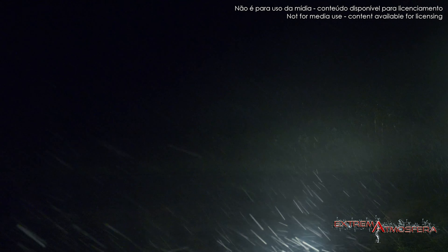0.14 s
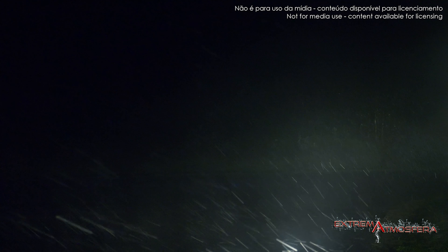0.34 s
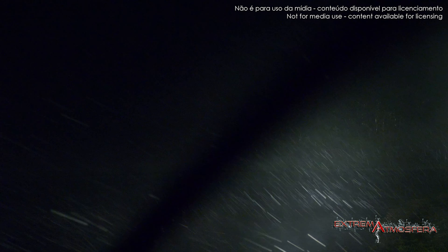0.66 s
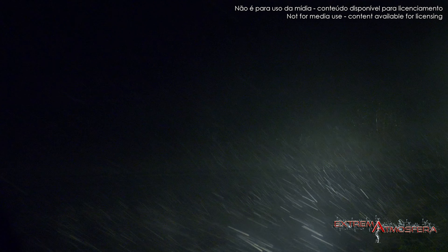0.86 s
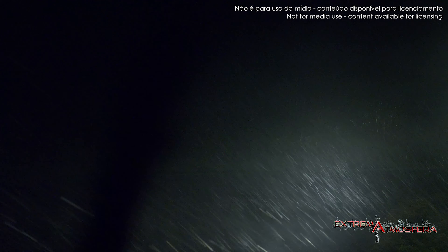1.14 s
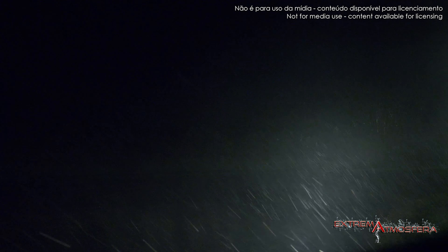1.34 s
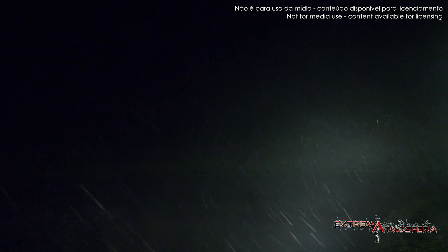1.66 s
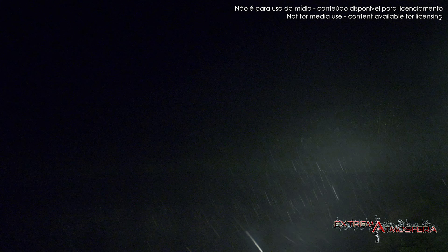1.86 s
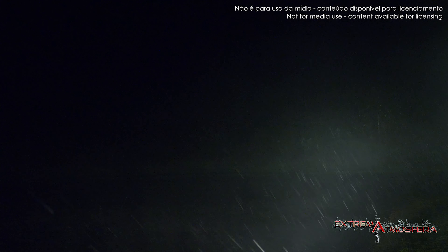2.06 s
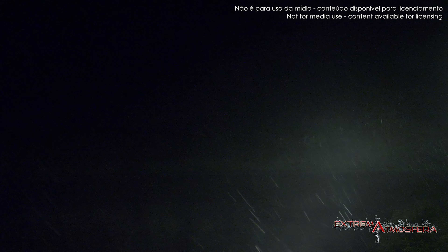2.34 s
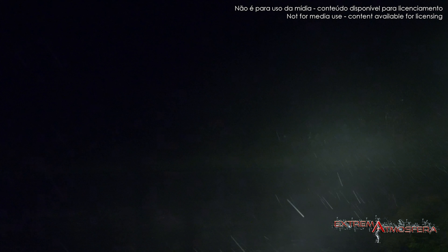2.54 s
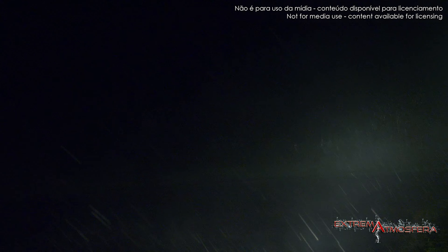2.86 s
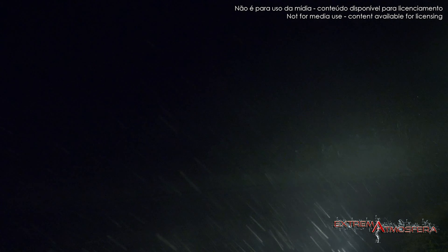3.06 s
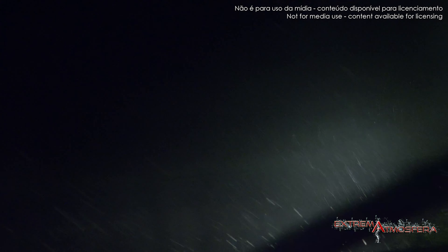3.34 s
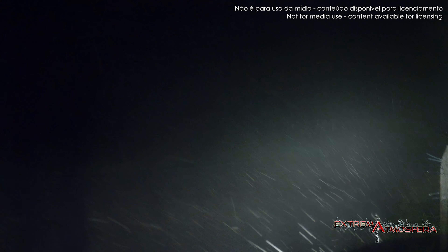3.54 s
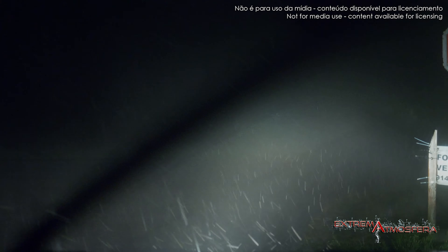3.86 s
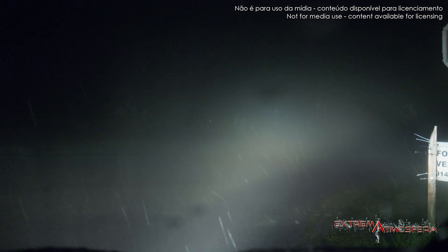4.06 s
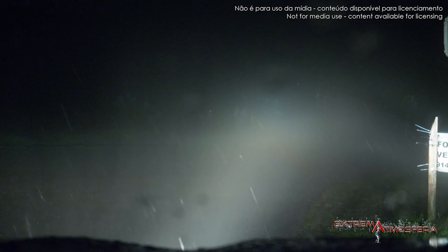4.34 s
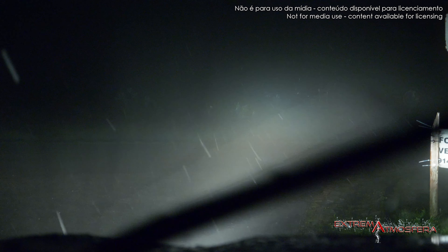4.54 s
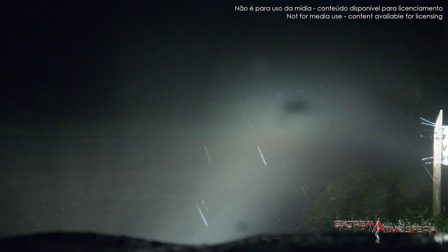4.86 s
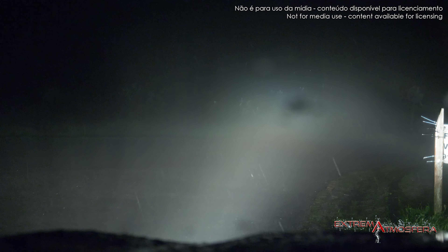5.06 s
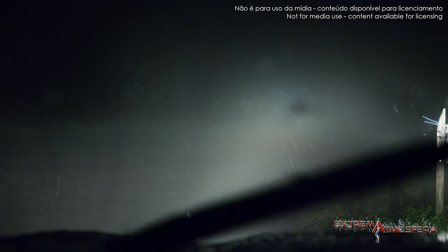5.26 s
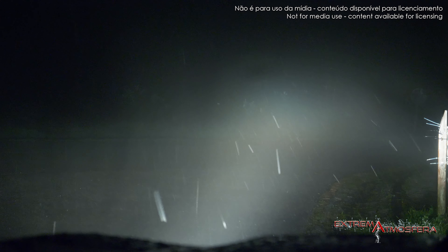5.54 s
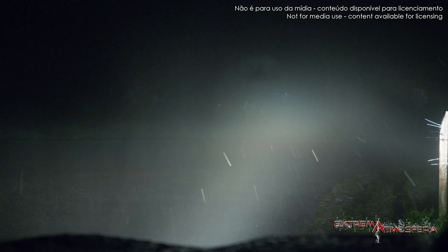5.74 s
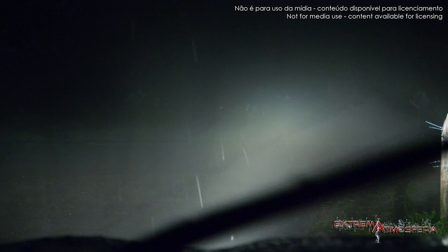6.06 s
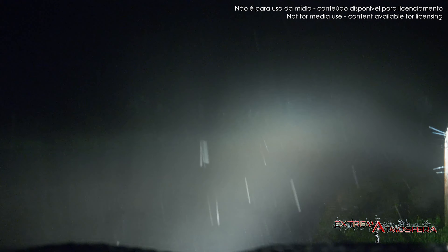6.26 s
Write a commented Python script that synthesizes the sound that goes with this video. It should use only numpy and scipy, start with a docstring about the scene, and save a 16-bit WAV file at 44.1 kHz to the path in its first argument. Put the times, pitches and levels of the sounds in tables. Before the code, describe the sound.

Sleet drums and hisses on a standing car, heard from inside, with wiper thuds, knocks and a low engine idle.

```python
"""Sleet on a standing car

Heard from inside at night: gusts of sleet drum on the panels, patter on the roof and hiss on the glass.
Single pellets tick; one hard gust rings the windscreen and dies with a whistle. The wiper thuds and
shudders at each turn and something knocks close by, over the idling engine and whining wiper motor."""
import sys
import numpy as np
from scipy import signal
from scipy.fft import rfft, irfft, next_fast_len
from scipy.io import wavfile
from scipy.ndimage import uniform_filter1d, map_coordinates

SR = 44100
rng = np.random.default_rng(int(sys.argv[2]) if len(sys.argv) > 2 else 0)


def unload_audio(sound):
    """Save the sound as a 16-bit wav file, at the path given as the first command line argument."""
    columns = np.transpose(np.atleast_2d(sound))
    # keep every value between -1 and 1, then stretch to whole-number steps
    steps = np.round(np.clip(columns, -1, 1) * 32767)
    wavfile.write(sys.argv[1], SR, steps.astype(np.int16))


N = 281799


def amp(db):
    return 10 ** (np.asarray(db) / 20)


def unit_rms(x):
    return x / np.sqrt(np.mean(x ** 2) + 1e-20)


def log_interp(points, hz):
    """Read (Hz, value) points along a log frequency axis."""
    point_hz, values = np.transpose(points)
    return np.interp(np.log(hz + 1), np.log(point_hz + 1), values)


def curves(rows):
    """One value per sample for each column after the time."""
    times_s, *columns = np.transpose(rows)
    return [np.interp(np.arange(N) / SR, times_s, column) for column in columns]


def wobble(knots_per_s):
    """A smooth random curve."""
    knots = rng.standard_normal(int(N * knots_per_s / SR) + 4)
    return map_coordinates(knots, [np.arange(N) * knots_per_s / SR])


def filtered(x, response):
    """Apply a gain given as a function of Hz."""
    size = next_fast_len(N + SR // 2)
    return irfft(rfft(x, size) * response(np.fft.rfftfreq(size, 1 / SR)), size)[..., :N]


def fuzzy_tone(rows, blur_hz, waver_db=2.5):
    """A sine along (s, Hz, dB) rows, jittering in pitch and level."""
    hz, db = curves(rows)
    level = amp(db + waver_db * wobble(40))
    return level * np.sin(2 * np.pi * np.cumsum(hz + blur_hz * wobble(90)) / SR)


# Stereo image of the sleet. Each row: frequency in Hz, left-right correlation.
CORRELATION = [(60, 1.0), (130, 1.0), (290, 1), (640, 0.98), (1410, 0.73), (3100, 0.72), (6820, 0.98),
               (15000, 0.69)]
# Windscreen resonances. Each row: centre in Hz, width in Hz, lift in dB.
GLASS_MODES = [(500, 120, 3), (1850, 200, 4), (3800, 400, 5), (5200, 400, 3), (7560, 400, 4),
               (9900, 600, 6), (11500, 450, 6), (13100, 400, 5)]


def shower(spectrum, on_glass, hits_per_s, spread_db, t60_s, burst_share, patchy_db):
    """Stereo pellet noise, rms 1: short uneven bursts on the blur of countless far ones."""
    hits = (rng.random(N) < hits_per_s / SR) * amp(spread_db * np.minimum(rng.exponential(size=N), 2))
    bursts = unit_rms(signal.lfilter([1], [1, -amp(-60 / (t60_s * SR))], hits))
    envelope = np.sqrt(1 - burst_share + burst_share * bursts ** 2)
    bins = signal.stft(rng.standard_normal((2, N)) * envelope, nperseg=128)[2]
    # Pellets land on different panels, so the colour comes in patches.
    patches = uniform_filter1d(uniform_filter1d(rng.standard_normal(bins.shape[1:]), 5, 0), 6, 1)
    pair = signal.istft(bins * amp(patchy_db * unit_rms(patches)), nperseg=128)[1][:, :N]

    def mid_side_gains(hz):
        angle = np.arccos(log_interp(CORRELATION, hz)) / 2
        glass_db = sum(db / (1 + (2 * (hz - centre) / width) ** 2) for centre, width, db in GLASS_MODES)
        return amp(log_interp(spectrum, hz) + on_glass * glass_db) * [np.cos(angle), np.sin(angle)]

    mid, side = filtered(pair, mid_side_gains)
    return unit_rms(np.array([mid + side, mid - side]))


# Storm strength. Each row: time in seconds, then drum, patter and hiss levels in dB.
STORM_LEVELS = [(0, -32.5, -44, -45), (.14, -42, -48, -46.5), (.3, -43.5, -48, -58),
                (.5, -44, -46.5, -58.5), (.8, -43.5, -50.5, -54.5), (1.12, -48, -44.5, -52),
                (1.28, -44, -49, -52), (1.5, -45.5, -48, -47), (1.9, -42, -45, -49), (2.3, -44, -46, -46),
                (2.52, -38, -43, -43), (2.9, -39.5, -42.5, -45), (3.1, -42, -45.5, -47),
                (3.56, -42, -40.5, -49), (3.68, -44.5, -44.5, -62), (4.2, -37, -41, -60),
                (4.5, -41.5, -45, -61.5), (4.9, -40, -50, -67.5), (5.5, -42, -54, -76),
                (5.88, -38, -51.5, -67), (6.03, -42.5, -49.5, -64), (6.39, -39, -56, -64.5)]
# Panel drum, roof patter, fine ice on glass. Each row: frequency in Hz, relative density in dB.
DRUM_SPECTRUM = [(50, -42), (85, -33), (99, -0.5), (144, -1.5), (248, -7), (451, -10), (632, -17),
                 (747, -21), (813, -27), (884, -40), (1500, -27.5), (1950, -50), (3300, -120)]
PATTER_SPECTRUM = [(210, -21), (350, -5.5), (449, -4.5), (494, -11), (749, -10.5), (814, -11.5),
                   (1460, -14.5), (1660, -16), (3820, -28.5), (6000, -40), (7800, -56), (13200, -120)]
HISS_SPECTRUM = [(880, -17), (1500, -8), (1620, -1.5), (2510, 0), (2880, -3.5), (3660, 0.5), (6760, -5.5),
                 (11300, -5.5), (14600, -11), (16000, -21)]


def sleet(shake_db=5, shake_s=0.052):
    """Three showers swell and flutter with the wind; the panels drum louder as the wiper turns."""
    drum_db, patter_db, hiss_db = curves(STORM_LEVELS)
    t = np.arange(N) / SR
    shake = sum(np.exp(-((t - turn_s) / shake_s) ** 2) for turn_s, *_ in PARK_TURNS + TOP_TURNS)
    flutter = wobble(12)
    drum = amp(drum_db + shake_db * shake + 1.54 * wobble(20)) * shower(
        DRUM_SPECTRUM, on_glass=0, hits_per_s=120, spread_db=-2,
        t60_s=0.062, burst_share=0.28, patchy_db=-0.06)
    patter = amp(patter_db + 0.13 * flutter) * shower(
        PATTER_SPECTRUM, on_glass=0.36, hits_per_s=220, spread_db=2.5,
        t60_s=0.043, burst_share=0.62, patchy_db=1)
    hiss = amp(hiss_db + 1.5 * flutter) * shower(
        HISS_SPECTRUM, on_glass=0, hits_per_s=170, spread_db=8.5,
        t60_s=0.012, burst_share=0.14, patchy_db=1.5)
    return drum + patter + hiss


# Engine tones. Each row: multiple of the firing rate, level in dB before the bass cut.
ENGINE_ORDERS = [(2, -41.5), (3, -54), (4, -50), (5, -55), (6, -46.5), (7, -51), (8, -60), (9, -55),
                 (10, -60)]


def engine(firing_hz=27.39, waver_db=0.7):
    """Idle: harmonics of the firing rate, the speed hunting slightly."""
    firings = np.cumsum(firing_hz * (1 + 0.002 * wobble(2))) / SR
    return sum(amp(db + waver_db * wobble(2.9)) * np.sin(2 * np.pi * (order * firings + rng.random()))
               for order, db in ENGINE_ORDERS)


# Motor and gear tones. Each row: time in seconds, pitch in Hz, level in dB.
MOTOR_WHINE = [(0, 1450, -70), (.25, 1450, -63), (.5, 1420, -70), (4.3, 1440, -66), (4.5, 1480, -59),
               (4.8, 1470, -61), (5.1, 1430, -62), (5.3, 1500, -58), (5.55, 1380, -59), (5.75, 1450, -62),
               (6.0, 1480, -58), (6.39, 1450, -59)]
GEAR_WHINE = [(4.9, 2400, -90), (5.2, 2420, -68), (5.7, 2400, -69), (6.0, 2400, -90)]


def wiper_motor():
    """A faint rough whine that bends with the load, and a weaker gear tone above it."""
    return fuzzy_tone(MOTOR_WHINE, blur_hz=35) + fuzzy_tone(GEAR_WHINE, blur_hz=35)


def stray_pellets(per_s=12):
    """Random tick rows: level follows the patter, brightness the hiss's lead over it."""
    level, brightness, pitch, pan = rng.standard_normal((int(per_s * N / SR), 4)).T
    start_s = rng.random(len(level)) * N / SR
    _, patter_db, hiss_db = np.array(curves(STORM_LEVELS))[:, (start_s * SR).astype(int)]
    db = patter_db + 9 + 3 * level
    bright_db = -1.5 + 0.77 * (hiss_db - patter_db) + 4 * brightness
    ping_hz = 3020 * np.exp(0.12 * pitch)
    return list(zip(start_s, db, bright_db, ping_hz, 3 * pan))


# Sharp ticks: sleet pellets and the cracks of knocks and wiper thuds. Each row: start in seconds,
# level in dB, bright band offset in dB, ping in Hz, left over right in dB.
SHARP_TICKS = [(.0384, -31, 9, 3640, 0), (.0864, -33, 9, 3870, 0), (.3153, -30.5, -12, 3680, -3),
               (.39, -29, -8, 2950, 2), (.443, -40, 13, 3040, 1), (.4539, -42, 15, 6250, -2),
               (.4716, -29.5, -10, 3880, 6), (.551, -21.5, -22, 2340, -7), (.5617, -20, -18, 3000, 6),
               (.5805, -22.5, -10, 2480, -3), (.6147, -27, -14, 3600, 1), (.636, -29, 3, 3520, 0),
               (.6635, -35, 5, 3570, 0), (.737, -31.5, 3, 3626, -8), (.7844, -35, 3, 3670, -5),
               (1.3083, -4.5, -20, 2200, -4), (1.5903, -27, 4, 2560, 0), (1.7926, -24.5, 10, 2420, 0),
               (2.0857, -4, -12, 3830, 0), (2.155, -24, 1.5, 3350, 0), (2.5716, -13, -5, 2640, 8),
               (2.6737, -32, 1, 8120, 0), (2.7515, -21, -9, 2870, 9), (2.7574, -23, 0, 2710, 3),
               (2.8045, -35, 12, 2580, 0), (2.9195, -27.5, 9, 3510, 0), (3.0041, -37, 11, 4340, 0),
               (3.1818, -24, 2, 3590, 0), (3.2046, -28, 9, 2480, 5), (3.2108, -14, -19, 2410, -6),
               (3.253, -27, 3, 3500, 0), (3.65, -28, -17, 3330, 0), (3.684, -30, -12, 2630, 1.5),
               (3.7, -36, -3, 3910, 0), (3.7194, -41, 3, 3450, 1), (3.7823, -28, -14, 2570, 1),
               (4.075, -25, -10, 2550, 1), (4.469, -29, -17, 2680, 0), (3.7648, -28, -29, 3200, -1),
               (3.8412, -30, -4, 3530, 3), (3.9514, -29.5, -12, 4150, 7), (4.0437, -25, -4, 4160, 3),
               (4.0925, -27, -21, 3610, 3), (4.121, -25.5, -17, 2880, 5), (4.167, -27, 3, 3670, 4),
               (4.2088, -27, -15, 3930, 0), (4.2384, -24, -19, 2560, 1), (4.2857, -30.5, 3.5, 3680, 0),
               (4.3174, -22, -5, 2950, -1.5), (4.3274, -24, -21, 2550, 5), (4.6004, -29, -19, 3050, -3),
               (4.7308, -34, 3, 3250, 0), (4.9228, -31, -29, 3800, 1.5), (5.01, -40.5, -18, 5600, 6),
               (5.408, -41, -4, 3130, 6), (4.9492, -35, -14, 3930, -3), (5.458, -39, -18, 2200, 1),
               (5.5039, -38, -12, 3200, -2), (5.5977, -42, -12, 2500, 1), (5.6785, -43, 0, 2850, 1),
               (5.7334, -54, 0, 2890, 0), (5.8825, -41, -8, 2500, 0), (5.6251, -37, -21, 3570, -1),
               (5.7959, -29, -22, 4600, 4), (5.8282, -26, -14, 3150, 4), (5.9216, -34, -26, 5570, 5),
               (5.969, -20.5, -6, 2750, 1), (5.9754, -25, -15, 2700, -3), (6.0085, -23.5, -12, 2760, 3),
               (6.0157, -33, -4, 2720, -9), (6.113, -42, -25, 5700, 1), (6.1847, -25.5, -9, 2640, 0),
               (6.211, -41, -9, 2700, 3)]


def sharp_ticks():
    """Each hard impact gives a short ping and a noise burst in a dull and a bright band."""
    def band(low_hz, high_hz):
        return lambda hz: 1 / np.sqrt((1 + (low_hz / (hz + 1)) ** 4) * (1 + (hz / high_hz) ** 4))

    dull, bright = np.zeros((2, 2, N + SR))
    t = np.arange(SR // 20) / SR
    burst = amp(-60 * t / 0.0081) * (1 - np.exp(-t / 0.00094))
    for start_s, db, bright_db, ping_hz, pan_db in SHARP_TICKS + stray_pellets():
        noise = rng.standard_normal((2, len(t)))
        gains = amp(db + np.array([[pan_db / 2], [-pan_db / 2]]))
        ping_gain = 0.2 * (ping_hz / 3500) ** 2.5  # higher pings ring more clearly
        ping = ping_gain * amp(-60 * t / 0.014) * np.sin(2 * np.pi * ping_hz * t)
        at = round(start_s * SR)
        dull[:, at:at + len(t)] += gains * (burst * noise[0] + ping)
        bright[:, at:at + len(t)] += gains * amp(bright_db) * burst * noise[1]
    return filtered(dull[:, :N], band(1100, 5500)) + filtered(bright[:, :N], band(7500, 14000))


# Body and dashboard modes. Each row: frequency in Hz, t60 in seconds.
BODY_MODES = [(105, 0.12), (120, 0.21), (145, 0.28), (185, 0.067), (220, 0.061), (285, 0.046), (370, 0.041),
              (470, 0.073), (530, 0.078), (630, 0.067), (700, 0.017), (820, 0.014)]
# Contact noise. Each row: frequency in Hz, gain in dB.
CRACK_SPECTRUM = [(400, 11.5), (700, 6.5), (1100, 0), (1950, -5), (3000, -14), (4500, -18.5), (8000, -38),
                  (16000, -37)]


def thuds(events, contacts, crack_t60_s=0.049):
    """Each contact pushes the modes near its centre in phase: a sharp swing, a ring, a crack on top."""
    ring, crack = np.zeros((2, N + SR))
    t = np.arange(SR // 5) / SR
    mode_hz, t60_s = np.transpose(BODY_MODES)[:, :, None]
    modes = np.sin(2 * np.pi * mode_hz * t) * amp(-60 * t / t60_s) * (1 - np.exp(-t / 0.0009))
    blows = [(start_s + pace * offset_s, db + offset_db, hz * ratio, crack_db + crack_offset_db)
             for rows, pattern in zip(events, contacts)
             for start_s, db, hz, crack_db, pace in rows
             for offset_s, offset_db, ratio, crack_offset_db in pattern]
    spots = amp(3 * rng.standard_normal((len(blows), len(modes))))  # every blow lands somewhere else
    for (start_s, db, centre_hz, crack_db), spot in zip(blows, spots):
        weights = spot * np.exp(-(np.log(mode_hz[:, 0] / centre_hz) / 0.37) ** 2)
        at = round(start_s * SR)
        ring[at:at + len(t)] += amp(db) * (weights / np.linalg.norm(weights)) @ modes
        crack[at:at + len(t)] += amp(db + crack_db - 60 * t / crack_t60_s) * rng.standard_normal(len(t))
    return ring[:N] + filtered(crack[:N], lambda hz: amp(log_interp(CRACK_SPECTRUM, hz)))


# Nearby knocks. Each row: start in seconds, level in dB, ring centre in Hz, crack offset in dB.
NEAR_KNOCKS = [(.045, -25, 153, -37), (0.065, -24.5, 158, -24), (0.151, -25.5, 182, -9),
               (0.172, -23, 152, -25), (.216, -24.5, 135, -22), (0.259, -27, 147, -10),
               (1.793, -7.5, 340, 4.5), (1.821, -17.5, 198, -6), (1.804, -20.5, 300, 2),
               (1.892, -25.5, 218, -18), (2.068, -24, 320, 1), (2.086, -2.5, 447, -8),
               (2.155, -17.5, 195, -2.5), (2.582, -22, 200, -7), (2.6, -23.5, 167, -10),
               (2.834, -27.5, 166, -15), (3.214, -32, 188, -14), (3.411, -24, 290, -13.5),
               (3.665, -27, 180, -9), (3.859, -25.5, 203, -9), (4.072, -31.5, 214, -3.5),
               (4.352, -19, 112, -30), (5.055, -37, 300, -8), (5.547, -33.5, 298, -17),
               (5.703, -29.5, 201, -21), (6.086, -32, 250, -16), (6.224, -30, 400, -4.5)]
# Wiper reversals at each end of the sweep. Each row: as for a knock, then time stretch of the shudder.
PARK_TURNS = [(2.751, -13, 227, -13.5, 0.84), (4.327, -15, 181, 1.5, 1.02), (5.828, -15, 246, -5, 1.05)]
TOP_TURNS = [(0.56, -20, 300, -7, 1.4), (1.975, -18, 336, -3, 0.84), (3.594, -15.5, 299, -20, 1.05),
             (5.109, -11, 239, -10.5, 0.97)]
# Contacts within one knock or reversal. Each row: offset in seconds, level offset in dB,
# ring centre ratio, further crack offset in dB.
KNOCK_CONTACTS = [(0, 0, 0.84, 0), (.005, -11.5, 1.02, -8.5), (.017, -9, 0.58, -4), (.033, -35, .6, -6)]
PARK_CONTACTS = [(-.043, -9, 1.3, -10), (-.022, -7.5, 1.35, -8), (-.008, -2.5, 1.25, -8), (0, 0.5, 0.87, 3),
                 (.016, 3, 1.3, -32), (.028, -6, 0.91, -18)]
TOP_CONTACTS = [(-.017, -6.5, 1.08, -8), (0, 0.5, 1.08, -3.5), (.013, -14.5, 1.9, -1),
                (.023, -1.5, .85, -10), (.04, -14, 0.6, -13)]


def knocks_and_wiper():
    """Rebounding knocks and the shuddering wiper linkage strike the same car body."""
    knocks = [(*row, 1) for row in NEAR_KNOCKS]  # no time stretch
    return thuds([PARK_TURNS, TOP_TURNS, knocks], [PARK_CONTACTS, TOP_CONTACTS, KNOCK_CONTACTS])


# Gust strength. Each row: time in seconds, level in dB.
GUST_LEVELS = [(.7, -92), (.88, -45), (1.0, -35), (1.1, -31.5), (1.3, -32), (1.42, -40), (1.65, -49),
               (1.85, -61), (2.1, -93)]
# Gust colour. Each row: frequency in Hz, relative density in dB.
GUST_SPECTRUM = [(210, -29), (350, -5.5), (498, -3), (899, -11.5), (1220, -9.5), (2750, -12.5), (3790, -11),
                 (6530, -16), (9900, -15.5), (13400, -16), (16000, -23)]


def hard_gust():
    """Dense sleet driven straight at the windscreen excites its resonances."""
    gust_db, = curves(GUST_LEVELS)
    return amp(gust_db + 0.57 * wobble(18.7)) * shower(
        GUST_SPECTRUM, on_glass=1, hits_per_s=650, spread_db=9,
        t60_s=0.0033, burst_share=0.14, patchy_db=1)


# Whistle glide. Each row: time in seconds, pitch in Hz, level in dB.
WHISTLE_GLIDE = [(1.55, 10100, -120), (1.6, 9950, -66), (1.66, 9150, -63), (1.7, 8500, -61),
                 (1.76, 7950, -63), (1.8, 7700, -120)]


def whistle():
    """A thin falling tone as the hard gust dies."""
    return fuzzy_tone(WHISTLE_GLIDE, blur_hz=25)


# Cabin decay. Each row: frequency in Hz, t60 in seconds.
CABIN_DECAY = [(300, 0.01), (2000, 0.063), (12000, 0.093)]


def cabin(x):
    """The small padded cabin reflects briefly, differently left and right, with the bass cut."""
    hz, t, bins = signal.stft(rng.standard_normal((2, SR // 5)), SR, nperseg=128)
    decay = amp(-60 * t / log_interp(CABIN_DECAY, hz)[:, None])
    tail = signal.istft(bins * decay, SR, nperseg=128)[1]
    wet = signal.fftconvolve(x, tail / np.linalg.norm(tail[0]), axes=1)[:, :N]
    return signal.sosfilt(signal.butter(3, 600, "high", fs=SR, output="sos"), wet)


def scene():
    """Stereo mix; only the ticks and thuds feed the cabin reflections."""
    hits = sharp_ticks() + knocks_and_wiper()
    return sleet() + hard_gust() + hits + amp(-5.5) * cabin(hits) + engine() + wiper_motor() + whistle()


# Faint high tone. Each row: time in seconds, pitch in Hz, level in dB.
HIGH_TONE = [(4.3, 13300, -100), (4.8, 13300, -88), (5.7, 13300, -88), (6.0, 13300, -100)]
SELF_HISS_DB, SELF_HISS_CORNER_HZ = -73, 5000
BASS_CUT_HZ, BAND_LIMIT_HZ = 88, 15800


def record(dry):
    """The microphone adds faint hiss and a high tone, then cuts the deep bass and top treble."""
    hiss = filtered(rng.standard_normal(N), lambda hz: 1 / (1 + (SELF_HISS_CORNER_HZ / (hz + 1)) ** 2))
    self_noise = amp(SELF_HISS_DB) * unit_rms(hiss) + fuzzy_tone(HIGH_TONE, blur_hz=30)
    bass_cut = signal.butter(6, BASS_CUT_HZ, "high", fs=SR, output="sos")
    return filtered(signal.sosfilt(bass_cut, dry + self_noise), lambda hz: hz < BAND_LIMIT_HZ)


dry = scene()
out = record(dry)
unload_audio(out)
```